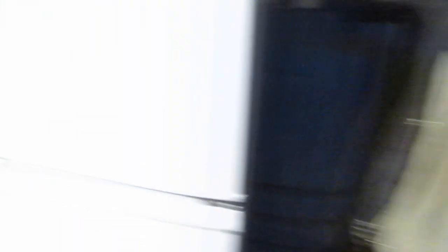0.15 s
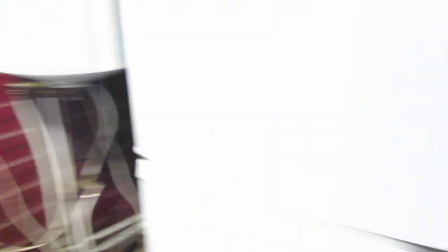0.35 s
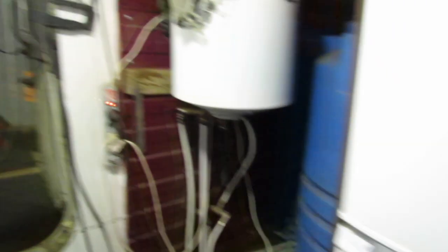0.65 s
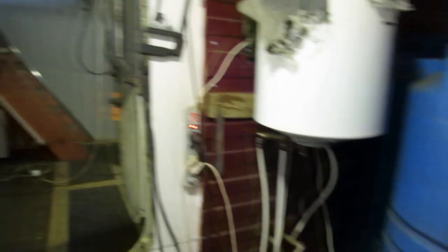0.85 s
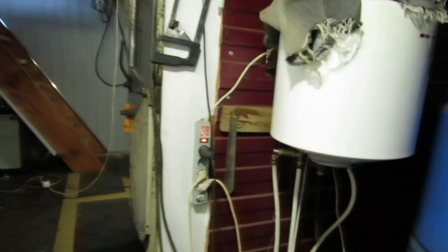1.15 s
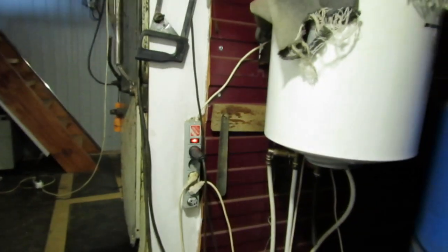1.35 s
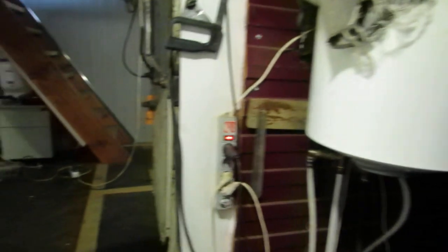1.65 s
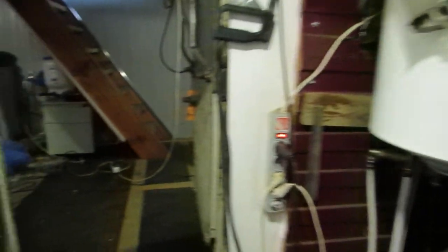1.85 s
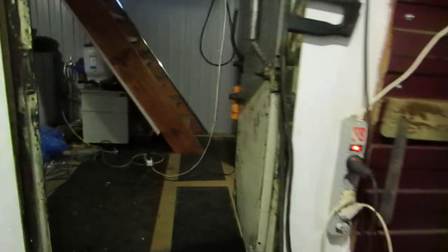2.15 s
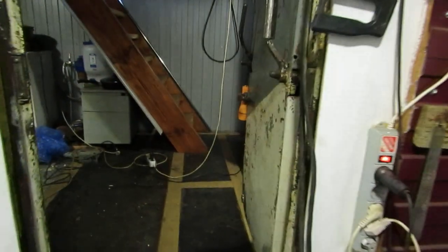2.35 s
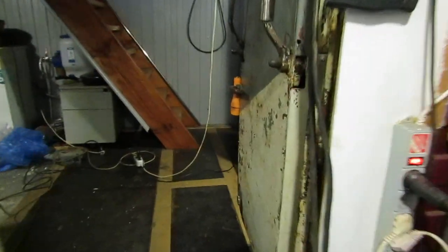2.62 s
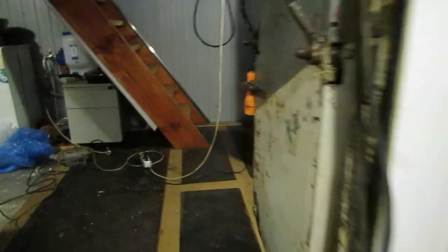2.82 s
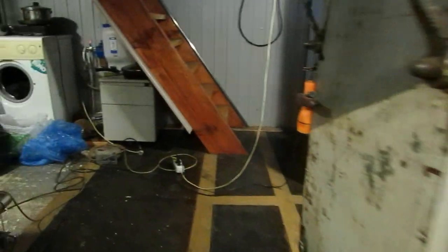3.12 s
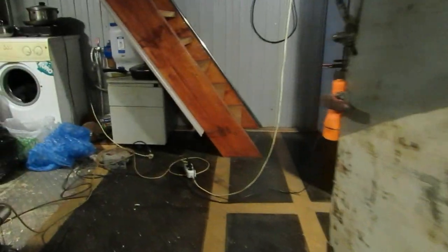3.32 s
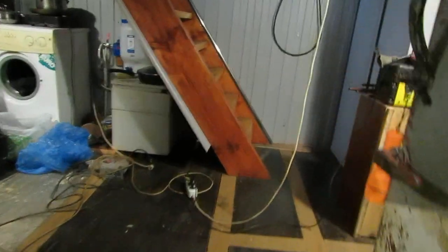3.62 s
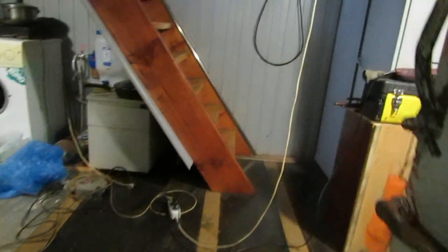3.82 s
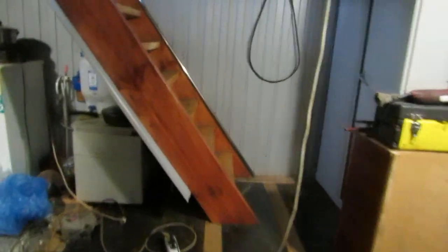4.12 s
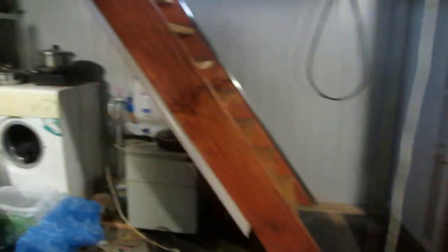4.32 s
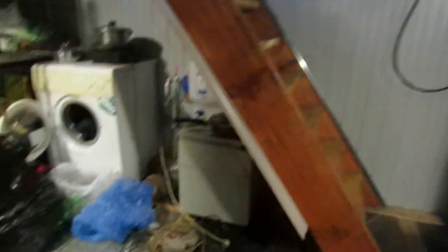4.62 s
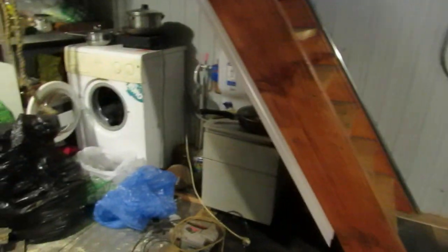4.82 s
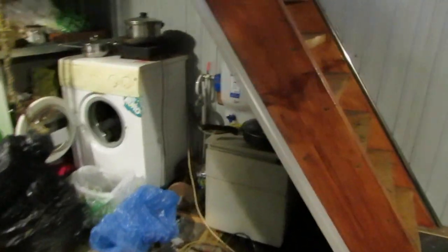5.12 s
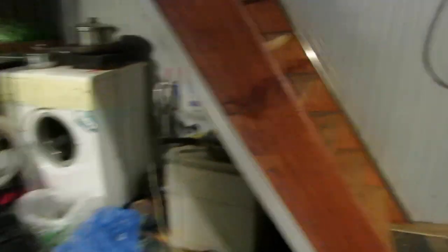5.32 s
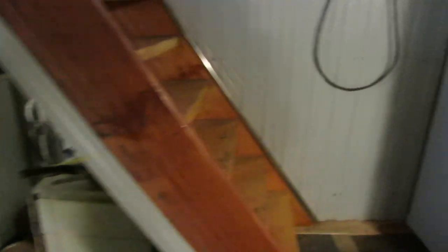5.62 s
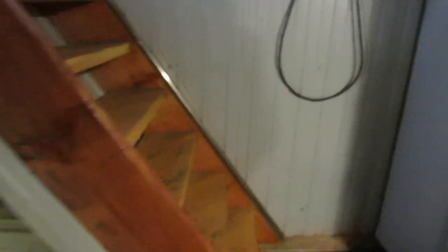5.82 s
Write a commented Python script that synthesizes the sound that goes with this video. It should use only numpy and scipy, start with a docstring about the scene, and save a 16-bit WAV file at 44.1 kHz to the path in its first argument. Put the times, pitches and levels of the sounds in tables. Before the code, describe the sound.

Inside a small boat cabin, a handheld microphone picks up steady dark air noise and a faint 100 Hz appliance hum that wavers and nearly vanishes around 4 s. Soft, boomy footfalls come irregularly at 0, 0.5, 1.05, 1.5 and 2.05 s, with gritty scuffs and a dull plastic tick at 0.15 s. A sole slides with a resonant rasp from 1.65 to 1.9 s. A firmer hollow thud lands at 2.7 s, and the strongest woody step at 3.4 s, followed by scuffing to 3.75 s. Clothes rustle softly throughout. At 4.1 s a foot drags, shaking boards, then a hard knock at 4.26 s rings a steel plate with a short clang. A tiny falling squeak comes at 4.85 s, a heavy step and scrape at 5.1 s, a loud sharp plastic snap, left of centre, at 5.44 s with a cloth flick, and shuffling thumps from 5.7 s to the end. Most sound leans right.

```python
"""Footfalls of someone walking through a boat cabin towards wooden stairs: each one bends a hollow floor panel
(damped modes), knocks boards and booms below (decaying noise). Soles scuff, slide, drag and squeak (grainy noise).
One hard knock rings a steel plate, perhaps the door: damped modes, a clang and a crack.
Clothes rustle as swells of bright noise, and dry plastic ticks pair a minimum-phase click with a short buzz.
Behind them lie steady air noise and an appliance's 100 Hz hum of wandering level, with a deep dip near 4 s."""
import sys
import numpy as np
from scipy import signal
from scipy.fft import rfft, irfft, next_fast_len
from scipy.io import wavfile
from scipy.ndimage import map_coordinates

SR = 44100
rng = np.random.default_rng(int(sys.argv[2]) if len(sys.argv) > 2 else 0)


def generate_wav(sig):
    """Save sig (samples, or channels by samples) to the path in sys.argv[1] as 16-bit PCM at SR."""
    pcm = np.round(np.clip(np.atleast_2d(sig).T, -1, 1) * 32767).astype(np.int16)
    wavfile.write(sys.argv[1], SR, pcm)


N = 262836

# footfalls of heel or toe, levels before the trim of each layer: (time [s], hollow boom [dB], boards [dB],
# heel knock [dB], contact time over which the sole takes the weight [s], panel pitch [Hz], panel gain [dB])
FOOTFALLS = [(.004, -35.5, -47.5, -55, 0.0017, 86, -45), (.456, -31.5, -41.5, -42, 0.0013, 100, -40),
             (.535, -39.5, -44.5, -43, 0.0067, 34, -39), (1.028, -41.5, -45.5, -42.5, 0.0044, 360, -33),
             (1.13, -39.5, -53.5, -54.5, .009, 69.7, -42), (1.522, -53, -43, -44, 0.00068, 444, -36.5),
             (1.990, -34.5, -45, -43, 0.0018, 99, -42), (2.060, -31.5, -48.5, -51.5, 0.0047, 74.3, -22.5),
             (2.100, -31, -43.5, -49, 0.0043, 40, -31.5), (2.619, -36.5, -58, -56, 0.0011, 76, -38.5),
             (2.7205, -24.5, -28.5, -37, 0.00093, 167.6, -16.5),
             (2.8464, -34, -33.5, -50, 0.0012, 91.5, -25), (3.387, -33, -20, -29.5, 0.0054, 199.7, -5.5),
             (3.548, -52, -35, -39.5, 0.0075, 348, -29), (3.59, -40.5, -33, -46, 0.014, 234, -34),
             (5.0966, -25.5, -22, -28, 0.01, 279.3, -11.5), (5.159, -29.5, -39, -39, 0.022, 45.3, -25.5),
             (5.687, -30, -30.5, -38.5, 0.0066, 117, -22), (5.768, -33.5, -37, -50, 0.0087, 178, -31),
             (5.875, -39, -34, -41, .014, 43, -29.5)]
# spectrum of a sharp crack or snap: (frequency [Hz], level [dB])
SNAP_SPECTRUM = [(150, -27), (600, -12.5), (1000, -2), (1400, -1.5), (2200, -5), (2700, -13), (3300, -2),
                 (5800, -4), (7600, -13), (15000, -35)]


def amp(db):
    """The decibel law: level to amplitude ratio."""
    return 10 ** (np.asarray(db) / 20)


def unit(x):
    """Normalization by signal power: scale to rms 1."""
    return x / np.sqrt(np.mean(x ** 2) + 1e-20)


def struck(x):
    """Normalization by onset power: scale a blow to rms 1 over its first 40 ms."""
    onset = x[..., :SR // 25]
    return x / np.sqrt(np.mean(onset ** 2) + 1e-20)


def along(points, hz):
    """Interpolation of (frequency [Hz], value) points on a logarithmic frequency axis."""
    f, v = np.transpose(points)
    return np.interp(np.log(hz + 1), np.log(f + 1), v)


def level(rows):
    """Envelope linear in decibels through (time [s], level [dB]) rows, -120 dB outside them."""
    s, db = np.transpose(rows)
    return amp(np.interp(np.arange(N) / SR, s, db, left=-120, right=-120))


def add(track, s, sound):
    """Superposition: mix a sound into the track from time s."""
    start = max(round(s * SR), 0)
    part = sound[..., :N - start]
    track[:, start:start + part.shape[-1]] += part


def filtered(x, response):
    """Linear filtering: multiply the spectrum by a function of frequency."""
    n = x.shape[-1]
    padded = next_fast_len(n + SR // 4)
    spectrum = rfft(x, padded) * response(np.fft.rfftfreq(padded, 1 / SR))
    return irfft(spectrum, padded)[..., :n]


def noise(gain, size):
    """Partial coherence: stereo noise of rms 1 whose left-right correlation depends on frequency."""
    # (frequency [Hz], left-right correlation [-1 to 1])
    correlation = [(60, 0.42), (250, 0.078), (500, 0.18), (1000, 0.021), (3000, 0.12), (10000, 0.18)]

    def mid_side_gain(hz):
        # mid cos(a) and side sin(a) give a left-right correlation of cos(2a)
        angle = np.arccos(np.clip(along(correlation, hz), -1, 1)) / 2
        return gain(hz) * np.array([np.cos(angle), np.sin(angle)])

    mid, side = filtered(rng.standard_normal((2, size)), mid_side_gain)
    return unit(np.array([mid + side, mid - side]))


def colour(points):
    """Spectral shaping: gain function of a (frequency [Hz], level [dB]) spectrum."""
    return lambda hz: amp(along(points, hz))


def grain(rate, depth_db, size):
    """Stick and slip: random gain of rms 1 of a surface that catches and lets go, rate times a second."""
    knots = rng.standard_normal(size // 8)
    swing = map_coordinates(knots, [np.arange(size) * rate / SR], mode="wrap")
    return unit(amp(depth_db * swing))


def ring(modes, t, scatter_db):
    """Modal superposition: damped sines of alternating sign, struck at new strengths each time."""
    total = 0
    for k, (hz, db, t60) in enumerate(modes):
        decay = amp(db + scatter_db * rng.normal() - 60 * t / t60)
        total = total + (-1) ** k * decay * np.sin(2 * np.pi * hz * t)
    return total


def burst(spectrum, t, rise, t60, tail_db, tail_t60):
    """Two-slope decay: dense resonances that die fast, and the slower answer of the cabin."""
    decay = amp(-60 * t / t60) + amp(tail_db - 60 * t / tail_t60)
    envelope = (1 - np.exp(-t / rise)) * decay
    return struck(noise(colour(spectrum), len(t)) * envelope)


def impulse(gain, size):
    """Minimum phase: the most compact causal click with this spectrum, peak 1, by folding the cepstrum."""
    cepstrum = irfft(np.log(gain(np.fft.rfftfreq(size, 1 / SR))), size)
    cepstrum[1:size // 2] *= 2
    cepstrum[size // 2:] = 0
    click = irfft(np.exp(rfft(cepstrum)), size)
    return click / np.abs(click).max()


def weight_db(heel_db):
    """Compressive power law: grit and rustle grow 0.71 dB per dB of heel knock, about -38.5 dB."""
    return -38.5 + 0.71 * (heel_db + 38.5)


def air():
    """Stationary broadband noise: the steady air of the cabin."""
    # (frequency [Hz], level [dB])
    air_spectrum = [(20, -14.5), (42, -10.5), (68, -2), (100, -7.5), (150, -11), (207, -8.5), (427, -14.5),
                    (857, -19), (1540, -23.5), (2540, -25), (4550, -27.5), (7950, -30), (15500, -44)]
    return amp(-49.5) * noise(colour(air_spectrum), N)


def hum():
    """Magnetic force follows current squared: a transformer hums at twice the mains frequency."""
    # level before a 3.5 dB cut: (time [s], level [dB])
    hum_level = [(0, -48.5), (.9, -42), (1.5, -50.5), (2, -41.5), (2.5, -44), (3.4, -43), (3.7, -43.5),
                 (4, -70), (4.7, -50.5), (5.96, -57)]
    phase = 2 * np.pi * 100 * np.arange(N) / SR
    tone = np.sin(phase) + amp(-34) * np.sin(2 * phase)
    return amp(-3.5) * level(hum_level) * tone


def swish(s, length):
    """Unequal Gaussian halves: gain of one stroke of cloth, a smooth rise and a slower fall."""
    rise_share = 0.39
    t = np.arange(N) / SR - s
    width = length * np.where(t < 0, rise_share, 1 - rise_share)
    return np.exp(-(t / width) ** 2 / 2)


def clothes():
    """Friction noise, powers added: fabric rustles with sleeves, after each footfall and when it snaps taut."""
    # sleeves brush past the microphone: (time of the peak [s], length [s], level [dB])
    swishes = [(.63, 0.15, -60), (1.73, .11, -49), (2.0, 0.038, -50), (2.32, 0.33, -56.5),
               (2.78, 0.13, -57), (3.2, 0.23, -51.5), (3.485, 0.077, -50), (3.59, 0.044, -51),
               (3.94, 0.16, -50), (4.15, 0.093, -56), (4.29, 0.1, -52), (4.65, .02, -58),
               (4.73, 0.019, -53), (4.87, 0.24, -56), (5.135, 0.028, -45.5), (5.27, 0.27, -57)]
    # fabric snaps taut: (time [s], level [dB])
    flicks = [(2.236, -63), (5.484, -38)]
    # (frequency [Hz], level [dB])
    fabric = [(800, -30), (2500, -1), (6000, 4.5), (9000, 3.5), (13000, 0), (16000, -1.5)]
    rest_db = -65  # clothes never lie quite still
    lag_s, length_s, jostle_db = 0.02, 0.022, -20.5  # each footfall shakes the clothes a little later
    flick_rise_s, flick_t60_s = 0.0023, 0.22

    strokes = list(swishes)
    for s, _, _, heel_db, *_ in FOOTFALLS:
        strokes.append((s + lag_s, length_s, weight_db(heel_db) + jostle_db))
    power = amp(rest_db) ** 2
    for s, length, db in strokes:
        power = power + (amp(db) * swish(s, length)) ** 2
    out = np.sqrt(power) * noise(colour(fabric), N) * grain(200, 1.15, N)

    t = np.arange(SR // 2) / SR
    for s, db in flicks:
        envelope = amp(db - 60 * t / flick_t60_s) * (1 - np.exp(-t / flick_rise_s))
        add(out, s, envelope * noise(colour(fabric), len(t)))
    return out


def ticks():
    """Impulse response of a light shell: dry plastic snaps near the microphone, with a buzz of the casing."""
    # (time [s], snap peak before panning [dB], left minus right [dB], slope above 1600 Hz [dB per octave])
    tick_rows = [(0.1447, -28.5, -7.5, -15), (2.650, -37, -7, -14), (3.297, -32, -8.5, -22),
                 (5.4393, -12, -10.5, -0.5)]
    # plastic casing: (frequency [Hz], level [dB])
    shell_spectrum = [(200, -50), (550, -1), (950, 7), (1400, 11), (2200, -1), (3500, 1), (7000, -30),
                      (15000, -55)]
    out, t = np.zeros((2, N)), np.arange(SR // 10) / SR
    for s, db, pan_db, slope_db in tick_rows:
        def dulled(points):
            return lambda hz: amp(along(points, hz) + slope_db * np.log2(np.maximum(hz / 1600, 1)))

        snap = impulse(dulled(SNAP_SPECTRUM), size=len(t))
        shell = amp(-16) * noise(dulled(shell_spectrum), len(t)) * amp(-60 * t / 0.028)
        pan = amp(np.array([[.5], [-.5]]) * pan_db)
        add(out, s, amp(db) * (snap + shell) * pan)
    return out


def squeak():
    """Stick-slip oscillation: rubber twists on the floor, a rough narrow band that falls in pitch."""
    # (time [s], frequency [Hz], level [dB])
    glide = [(4.801, 4330, -72), (4.83, 3980, -58), (4.865, 2965, -51.5), (4.90, 2590, -63),
             (4.96, 2270, -60)]
    s, hz, db = np.transpose(glide)
    phase = 2 * np.pi * np.cumsum(np.interp(np.arange(N) / SR, s, hz)) / SR
    # low noise multiplies the sine and spreads it into a band
    rough = noise(colour([(150, -3), (400, -1), (1200, -26), (3000, -75)]), N)
    return level(np.transpose([s, db])) * unit(rough * np.sin(phase))


def scuffs():
    """Intermittent friction: soles catch on the floor in short grainy swells."""
    # (time of the peak [s], rise [s], level [dB], centre [Hz], width [octaves])
    scuff_rows = [(.012, .011, -53.5, 4050, 0.69), (0.547, 0.066, -49, 1050, 1.1),
                  (.548, .008, -49.5, 4170, 0.31), (.62, .02, -43.5, 630, 0.83),
                  (1.135, 0.035, -54.5, 1190, 1.4), (1.619, 0.035, -48, 2700, 0.98),
                  (1.844, 0.029, -40.5, 1480, 0.58), (1.963, 0.0021, -42.5, 1048, 0.93),
                  (2.112, 0.00196, -43, 730, .26), (2.236, 0.0021, -40.5, 1500, 1.6),
                  (2.824, 0.019, -47.5, 2540, 0.75), (2.894, 0.018, -44.5, 1500, 1.3),
                  (3.134, .0042, -54, 3030, .78), (3.47, 0.023, -40.5, 2348, 1.7),
                  (3.547, .007, -35.5, 1210, .5), (3.598, .045, -39, 1290, 1),
                  (3.748, .0073, -49, 3260, 0.64), (5.134, 0.023, -32, 1840, 0.59),
                  (5.254, 0.037, -44, 830, 1), (5.725, 0.019, -44, 1590, 1.3),
                  (5.882, 0.024, -42.5, 1510, 1.34), (5.913, .002, -33, 1420, 0.77)]
    t60_s, catches_per_s, catch_db = 0.26, 326, 1.1
    out, t = np.zeros((2, N)), np.arange(SR // 2) / SR
    for s, rise, db, centre_hz, octaves in scuff_rows:
        def hump(hz):
            return (1 + (np.log2((hz + 1) / centre_hz) / octaves) ** 2 / 2) ** -1.6

        envelope = np.minimum(t / rise, 1) * amp(db - 60 * np.maximum(t - rise, 0) / t60_s)
        scuff = envelope * noise(hump, len(t)) * grain(catches_per_s, catch_db, len(t))
        add(out, s - rise, scuff)
    return out


def slide():
    """Friction exciting resonators: a sole slides over the floor, resonant noise over a broad rasp."""
    # gain of the resonant and rasping noise: (time [s], level [dB])
    slide_level = [(1.64, -59), (1.652, -57), (1.666, -46.5), (1.72, -41.5), (1.808, -42.5), (1.842, -41.5),
                   (1.9, -54.5)]
    # resonances: (frequency [Hz], bandwidth [Hz], level [dB])
    resonances = [(558, 85, 2.5), (878, 32, 6.5), (1310, 280, -8), (1970, 320, -11), (2300, 300, -8),
                  (3130, 380, -7.5), (4890, 290, -6.5), (6840, 1600, -23)]
    # (frequency [Hz], level [dB])
    rasp_spectrum = [(200, 6), (500, 3), (1500, -1), (3500, -10), (7000, -8), (15000, -36)]

    def sole(hz):
        total = 0
        for k, (centre, width, db) in enumerate(resonances):
            damping = 1j * hz * width
            total = total + (-1) ** k * amp(db) * damping / (centre * centre - hz * hz + damping)
        return total

    rubbing = noise(sole, N) + amp(-5) * noise(colour(rasp_spectrum), N)
    return level(slide_level) * rubbing * grain(350, 0.78, N)


def drag():
    """Friction-driven vibration: a foot drags and shakes the boards."""
    # (time [s], level [dB])
    drag_level = [(4.06, -57), (4.10, -44.5), (4.125, -38.5), (4.2, -36.5), (4.25, -44), (4.3, -57)]
    # (frequency [Hz], level [dB])
    drag_spectrum = [(59, -58), (100, -29), (208, -7), (283, -1.5), (449, -15.5), (624, -13), (700, -22.5),
                     (1300, -17), (2180, -31), (2650, -25.5), (2860, -31.5), (10000, -45), (13000, -72),
                     (22000, -120)]
    return level(drag_level) * noise(colour(drag_spectrum), N) * grain(140, 1.0, N)


def steel_plate():
    """Modal ringing with frequency-dependent damping: a hard knock gives plate modes, a clang and a crack."""
    # plate modes: (frequency [Hz], level [dB], decay time t60 [s])
    plate_modes = [(83, 2, 0.36), (206.5, -6.5, 1), (284, -5.5, 0.6), (660, -5.5, 0.41), (749, -5, 0.24),
                   (743, -6.5, 0.32), (985, -10.5, 0.34), (1140, -18, .28), (1217, -10, 0.32),
                   (1306, -7.5, 0.27), (1610, -12.5, 0.32), (1800, -18, 0.28), (2040, -22, 0.21),
                   (2230, -23, .22), (2630, -16, 0.32)]
    # (frequency [Hz], level [dB])
    clang_spectrum = [(40, -25), (80, -8), (150, -8.5), (290, -9.5), (530, -11.5), (740, -7), (900, -13.5),
                      (1290, -9.5), (1520, -19), (1750, -13.5), (3500, -27), (4800, -28), (8000, -43),
                      (15500, -64)]
    # decay of the clang, longest in the bass: (frequency [Hz], decay time t60 [s])
    cabin_decay = [(60, 0.98), (250, 0.91), (700, 0.42), (2000, 0.42), (6000, 0.46), (15000, .2)]
    knock_s, plate_rise_s, crack_t60_s = 4.2585, 0.0026, 0.025
    out, t = np.zeros((2, N)), np.arange(SR) / SR

    # each frequency bin of the clang decays at its own rate
    hz, frames, z = signal.stft(noise(colour(clang_spectrum), SR), SR, nperseg=256)
    decay = amp(-60 * frames / along(cabin_decay, hz)[:, None])
    clang = signal.istft(z * decay, SR, nperseg=256)[1][:, :SR]
    plate = ring(plate_modes, t, scatter_db=1) * (1 - np.exp(-t / plate_rise_s))
    crack = noise(colour(SNAP_SPECTRUM), SR) * amp(-60 * t / crack_t60_s)
    knock = amp(-24) * struck(clang) + amp(-25.5) * struck(plate) + amp(-34) * crack
    add(out, knock_s, knock)
    return out


def panel(t, hz, contact):
    """Bending modes of a plate: the floor panel underfoot rings, the lower its pitch, the longer."""
    # (multiple of the panel pitch [ratio], level [dB], share of the panel t60 [ratio])
    mode_rows = [(.42, -18, 1.3), (.65, -10, 1.1), (.77, -13, 1.1), (1, 0.5, 1.44), (1.615, -9.5, 1.36),
                 (2.17, -24.5, 1.9), (3.3, -28, 0.89)]
    t60 = 0.15 * (200 / hz) ** 0.52  # 0.15 s for a panel of 200 Hz
    modes = [(multiple * hz, db, share * t60) for multiple, db, share in mode_rows]
    # the panel bends over 1.53 contact times
    return ring(modes, t, scatter_db=2.0) * (1 - np.exp(-t / (1.53 * contact)))


def footsteps():
    """Impact excitation: each footfall bends a panel, knocks boards, booms in the hollow and crushes grit."""
    # boards and the space under them: (frequency [Hz], level [dB], decay time t60 [s])
    board_modes = [(116.8, 3.5, 0.29), (164.2, -14, 0.66), (184.7, 2, 0.36), (208.5, -3, 0.24),
                   (249.8, 1.5, 0.37), (282.6, 1.5, 0.39), (328.8, -3.5, 0.27), (375, -9, 0.26),
                   (426, -11.5, 0.35), (469.3, -5.5, 0.24), (496, -14.5, 0.35), (655, -8.5, .25),
                   (900, -15, 0.46), (1087, -18, 0.32)]
    # spectra of the noise layers, each: (frequency [Hz], level [dB])
    boom_spectrum = [(20, -23), (40, -3.5), (62, -8.5), (85, -2.5), (120, -10), (170, -17), (400, -69),
                     (900, -120)]
    wood_spectrum = [(70, -55), (130, -15), (200, 0.5), (320, 3), (460, -3), (650, -13), (1500, -56),
                     (4000, -120)]
    heel_spectrum = [(200, -83), (450, -1), (650, 0.5), (950, -4), (1400, -6.5), (2200, -39), (6000, -68)]
    grit_spectrum = [(600, -53), (1500, 5), (2800, 2.5), (5000, -3.5), (9000, -15), (16000, -57.5)]
    boom_trim, board_trim, wood_trim, heel_trim, grit_trim = -3.5, -5, -4, -4, -12  # dB
    out, t = np.zeros((2, N)), np.arange(SR) / SR
    for s, boom_db, board_db, heel_db, contact, panel_hz, panel_db in FOOTFALLS:
        boom = burst(boom_spectrum, t, 2 * contact, t60=0.26, tail_db=-15.5, tail_t60=1.0)
        boards = struck(ring(board_modes, t, scatter_db=1.5) * (1 - np.exp(-t / contact)))
        wood = burst(wood_spectrum, t, contact, t60=0.21, tail_db=-9.5, tail_t60=0.81)
        heel = burst(heel_spectrum, t, contact, t60=0.25, tail_db=-15, tail_t60=0.61)
        grit = burst(grit_spectrum, t, contact, t60=0.33, tail_db=4, tail_t60=0.69)
        grit = grit * grain(389, 1.0, len(t))

        step = amp(panel_db) * panel(t, panel_hz, contact)
        step = step + amp(boom_db + boom_trim) * boom
        step = step + amp(board_db + board_trim) * boards
        step = step + amp(board_db + wood_trim) * wood
        step = step + amp(heel_db + heel_trim) * heel
        step = step + amp(weight_db(heel_db) + grit_trim) * grit
        add(out, s, step)
    return out


def scene():
    """Interaural level and time difference: all sounds, stronger on the right but earlier on the left."""
    # (frequency [Hz], level by which the left side is weaker [dB])
    lean = [(30, 4.5), (120, 6.5), (250, 6), (600, 3.5), (4000, 2.5), (12000, 1.5)]
    left_lead_s = 0.00004
    sound = air() + hum() + clothes() + ticks() + squeak()
    sound = sound + scuffs() + slide() + drag() + steel_plate() + footsteps()
    sides = np.array([[-.5], [.5]])

    def placed(hz):
        delay = np.exp(-2j * np.pi * hz * sides * left_lead_s)
        return amp(sides * along(lean, hz)) * delay

    return filtered(sound, placed)


def record(dry):
    """Band limiting: a steep low-pass at 15.8 kHz."""
    return filtered(dry, lambda hz: 1 / (1 + (hz / 15800) ** 200))


dry = scene()
out = record(dry)
generate_wav(out)
```